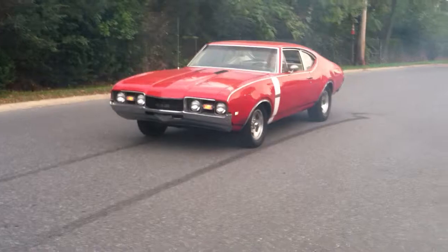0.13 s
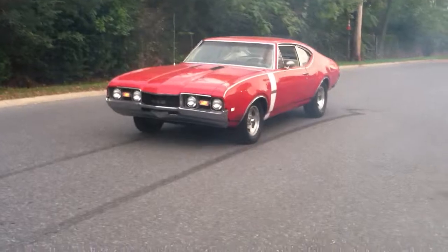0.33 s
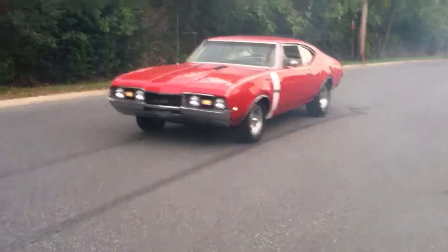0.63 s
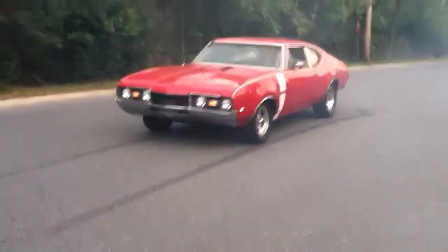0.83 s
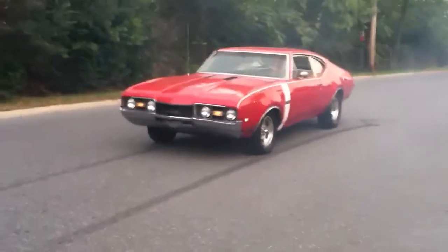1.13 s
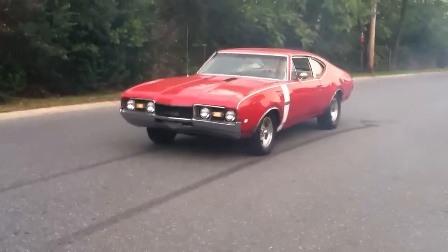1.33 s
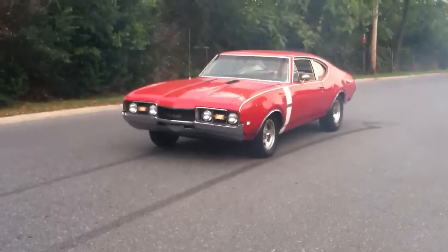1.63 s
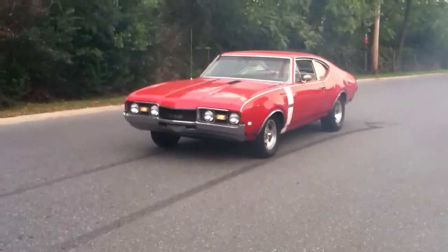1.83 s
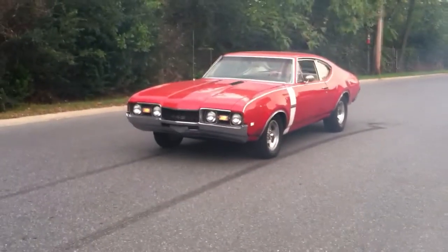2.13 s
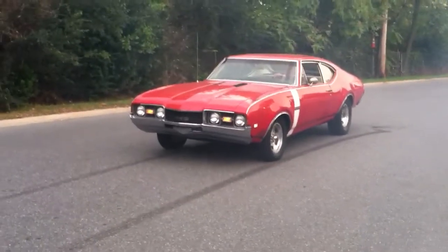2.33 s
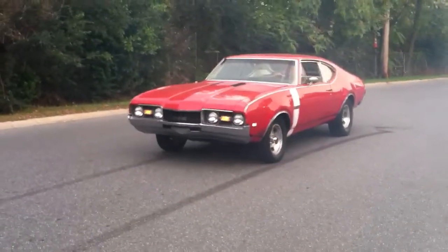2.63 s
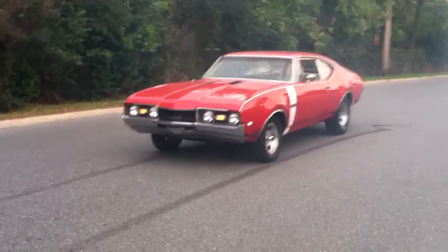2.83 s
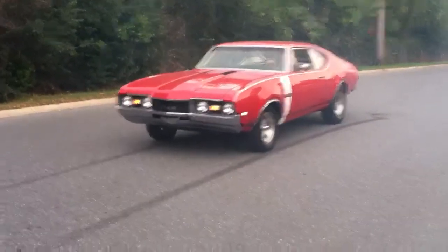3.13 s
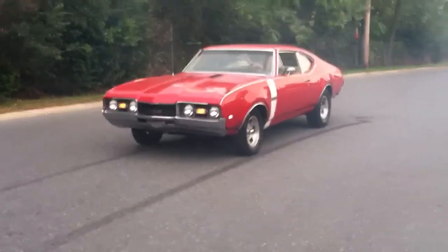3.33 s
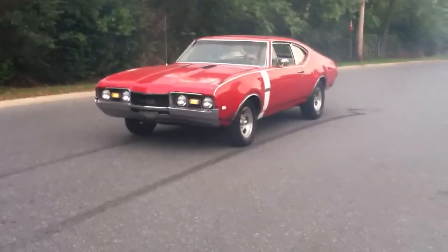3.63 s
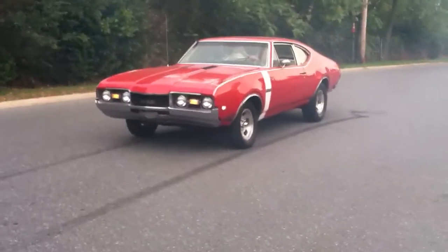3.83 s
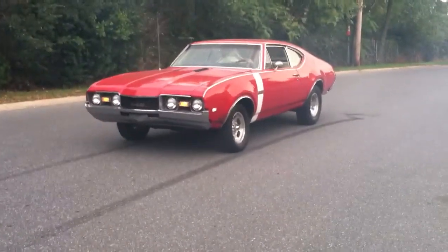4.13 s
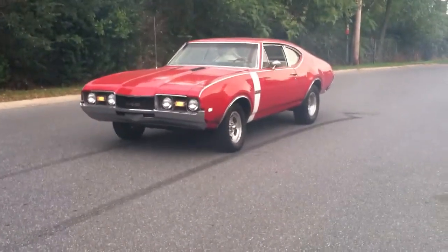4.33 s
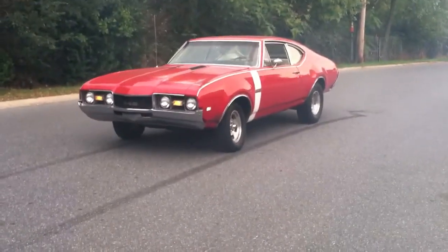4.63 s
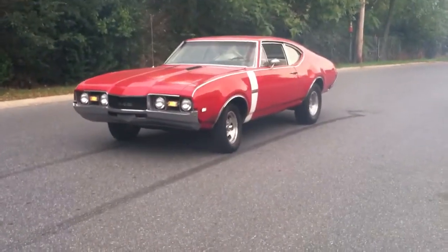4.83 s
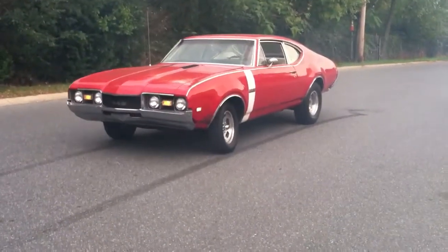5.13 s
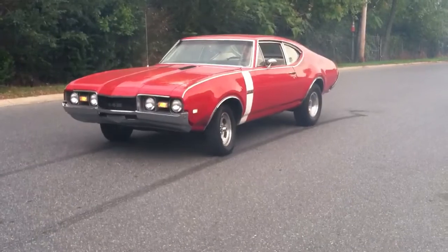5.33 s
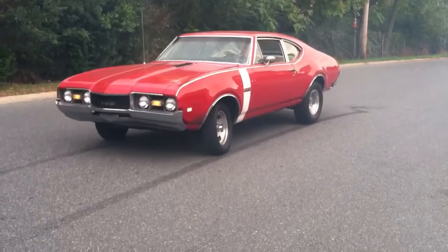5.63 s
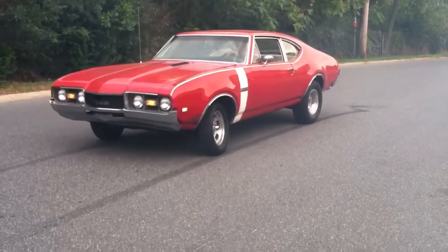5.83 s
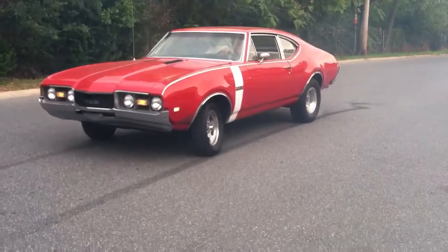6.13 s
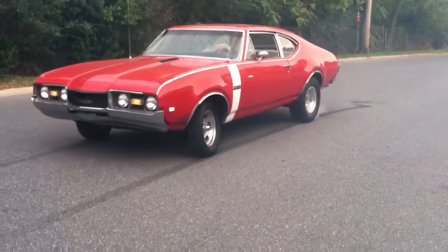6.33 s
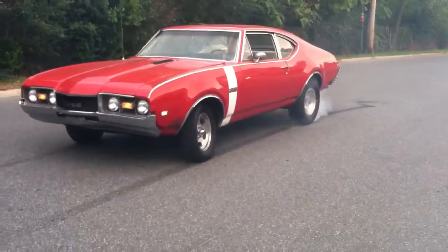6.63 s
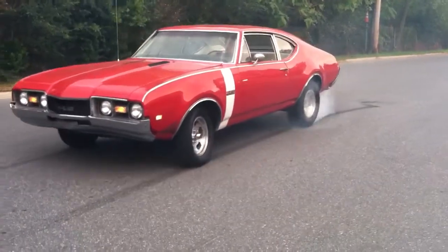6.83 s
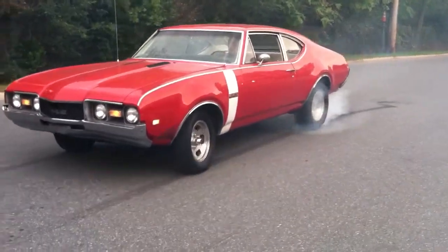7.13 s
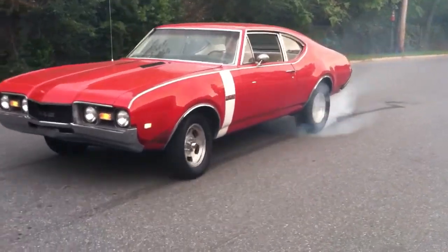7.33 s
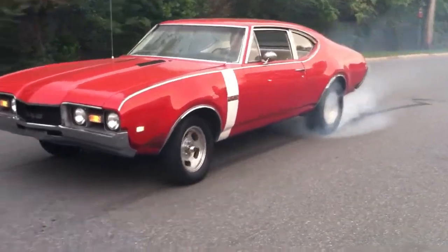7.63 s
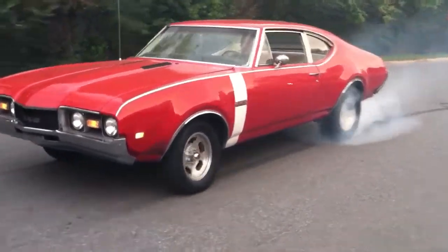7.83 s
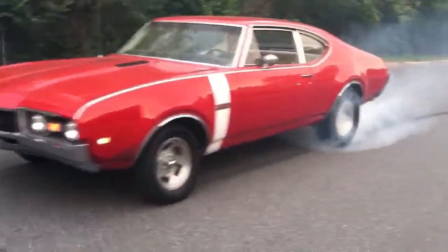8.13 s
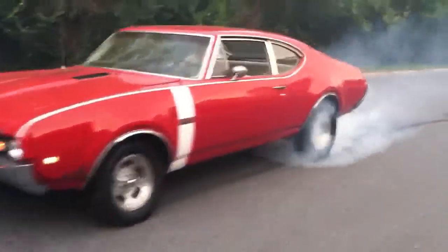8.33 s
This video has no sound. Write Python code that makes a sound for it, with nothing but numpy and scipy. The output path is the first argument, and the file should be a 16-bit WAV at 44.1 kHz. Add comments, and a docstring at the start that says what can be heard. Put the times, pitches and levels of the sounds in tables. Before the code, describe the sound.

After a tiny blank, a large V8 idles quietly and unevenly from 0 to 2 s: soft irregular puffs, breathy fluttering hiss, faint pipe ringing, a dull knock near 0.75 s and a lower one near 1.95 s. From 2 to 2.9 s revs rise quickly in surges, with about seven short brake chirps near 2.4 kHz between 2.3 and 2.9. The engine holds a steady, pulsing low growl until 3.75 s, then jumps much louder. At 3.9 s the tyres break loose: a continuous rough, fluttering squeal near 950 Hz, joined by an intermittent higher tread tone around 1.6 kHz. Revs climb gradually, then faster from 5.7 to 6.4 s, and plateau in a hard roar while the squeal rises slightly above 1 kHz. Around 8.2 s revs sag briefly; roar and sharper squeal continue to the cut at 8.5 s. Dry outdoor mono, thin bass, compressed peaks.

```python
"""A large V8 idles unevenly on a road, is loaded against the brakes, and then spins its rear tyres.
The exhaust is a set of climbing tones (orders) plus random firings, both ringing through the pipes.
Shaped noise makes the hiss and roar, with puffs at idle; wavering tones make the brake chirps.
The tyre squeal is two fluttering tones near 1 kHz with a higher tread tone. Dull knocks, deep
pressure lumps and a quiet street background complete the scene."""
import sys
import numpy as np
from scipy import signal
from scipy.fft import rfft, irfft
from scipy.io import wavfile
from scipy.ndimage import uniform_filter1d, minimum_filter1d

SR = 44100
rng = np.random.default_rng(int(sys.argv[2]) if len(sys.argv) > 2 else 0)


def volts_from_db(level):
    """Convert decibel levels to linear amplitude ratios."""
    exponent = np.asarray(level, float) / 20
    return 10 ** exponent


def to_wav(sig):
    """Store sig (one row per channel, or 1-D mono) as 16-bit WAV at the path in sys.argv[1].

    Samples outside -1..1 are clipped; the rate is SR.
    """
    pcm = np.clip(np.atleast_2d(sig), -1, 1) * 32767
    pcm = np.round(pcm).astype(np.int16)
    wavfile.write(sys.argv[1], SR, pcm.T)  # frames by channels


N = 373527
T = np.arange(N) / SR  # time of each sample, s

# Engine speed: time_s, speed_hz (four-stroke cycles per second)
ENGINE_SPEED = [(0, 5.61), (1.4, 5.83), (2, 6.94), (2.3, 9.52), (2.6, 12.8), (2.75, 13.8), (2.9, 14.43),
                (3.5, 14.35), (3.73, 14.6), (3.84, 16.48), (3.98, 19.47), (4.19, 23.18), (4.3, 24.7),
                (4.47, 26.03), (4.6, 26.71), (5, 28.1), (5.4, 29.18), (5.68, 30.8), (5.87, 33.1), (6, 35.6),
                (6.2, 40.6), (6.32, 42.66), (6.48, 44.7), (6.8, 45.65), (7.4, 45.8), (7.8, 46.65),
                (8.07, 46.6), (8.14, 45.1), (8.24, 41.1), (8.3, 40.35), (8.47, 41.1)]
# Effort of the engine, before the quick changes: time_s, exhaust_db, hiss_db (hiss from 3 to 9 kHz)
EFFORT = [(0, -48, -43), (.75, -42, -42.5), (.95, -45, -46), (2.04, -42, -43.5), (2.3, -30, -39.5),
          (2.4, -29, -35.5), (2.8, -24, -36), (3.15, -25, -34), (3.72, -24, -30.5), (3.86, -17.5, -25),
          (4.12, -17, -24), (4.4, -22, -25), (5, -22, -25), (5.64, -20, -25), (8.1, -20.5, -23.5),
          (8.2, -24, -24.5), (8.28, -18, -24), (8.47, -18, -22)]
# Share of the exhaust power that comes from random firing: time_s, share
UNEVEN = [(2.1, .9), (2.4, .55), (2.62, .3), (2.8, .04), (3.7, .04), (3.9, .12), (4.3, .06), (5.6, .06),
          (5.9, .16), (6.2, .14), (6.45, .01)]
# Engine speeds at which the order patterns below hold: speed_hz
ORDER_SPEEDS = 14.4, 22, 28.3, 30.5, 33.5, 40.7, 45.8, 46.3
# Exhaust orders at those speeds, pipe colour included: multiple_of_cycle, level_db
ORDERS_AT = [
    [(1, -41), (2, -43), (3, -50), (4, -35), (5, -33), (6, -32), (7, -30), (8, -5), (9, -5), (10, -27),
     (11, -3), (12, -8), (13, -9), (14, -15), (15, -14), (16, -3), (17, 0), (18, -11), (19, -6), (20, -13),
     (21, -19), (22, -26), (23, -18), (24, -24), (25, -15), (26, -28), (27, -15), (28, -26), (29, -32),
     (30, -27), (31, -25), (32, -15), (33, -18), (34, -25), (35, -19), (36, -18), (37, -16), (38, -33),
     (39, -20), (40, -19), (41, -22), (42, -33), (43, -28), (44, -22), (45, -21), (46, -24), (47, -24),
     (48, -25), (49, -20), (50, -18), (51, -24), (52, -19), (53, -28), (54, -26), (55, -28), (56, -27),
     (57, -21), (58, -23), (59, -24), (60, -23)],
    [(1, -42), (2, -42), (3, -39), (4, -32), (5, -21), (6, -18), (7, -13), (8, -8), (9, -17), (10, -17),
     (11, 3), (12, -13), (13, -17), (14, -18), (15, -19), (16, -16), (17, -15)],
    [(1, -45), (2, -42), (3, -35), (4, -21), (5, -8), (6, -19), (7, -13), (8, -9), (9, 0), (10, -8),
     (11, -22), (12, -22), (13, -13), (14, -18), (15, -16), (16, -22), (17, -9), (18, -15), (19, -13),
     (20, -18), (21, -13), (22, -11), (23, -15), (24, -11), (25, -13), (26, -10), (27, -12), (28, -18),
     (29, -10), (30, -8)],
    [(1, -48), (2, -40), (3, -29), (4, -19), (5, -10), (6, -17), (7, -11), (8, -2), (9, 0), (10, -12),
     (11, -17), (12, -8), (13, -16), (14, -19), (15, -14), (16, -7), (17, -13), (18, -16), (19, -12),
     (20, -14), (21, -13), (22, -10), (23, -9), (24, -13), (25, -8), (26, -12), (27, -9)],
    [(1, -37), (2, -35), (3, -31), (4, -21), (5, -5), (6, -4), (7, -3), (8, 0), (9, -5), (10, -11),
     (11, -5), (12, -15), (13, -10), (14, -18), (15, -17), (16, -6), (17, -11), (18, -11), (19, -14),
     (20, -11), (21, -11), (22, -5), (23, -9), (24, -8)],
    [(1, -46), (2, -48), (3, -22), (4, -19), (5, -16), (6, 0), (7, -13), (8, -17), (9, -9), (10, -19),
     (11, -30), (12, -11), (13, -18), (14, -16), (15, -18), (16, -10), (17, -17), (18, -14), (19, -13),
     (20, -13), (21, -21), (22, -11)],
    [(1, -48), (2, -45), (3, -15), (4, -9), (5, -4), (6, 0), (7, -22), (8, -4), (9, -9), (10, -21),
     (11, -11), (12, -5), (13, -15), (14, -7), (15, -10), (16, 0), (17, -4), (18, -13), (19, -8), (20, -10)],
    [(1, -45), (2, -37), (3, -11), (4, -17), (5, -2), (6, -2), (7, -20), (8, -11), (9, -8), (10, -19),
     (11, -16), (12, 0), (13, -15), (14, -7), (15, -6), (16, 1), (17, -3), (18, -15), (19, -9), (20, -11)],
]
# Which of the eight firings leave by the nearer pipe: 1 for near, 0 for far
NEAR_BANK = 1, 0, 1, 1, 0, 1, 0, 0
# Colour of the exhaust pipes: frequency_hz, gain_db
PIPE = [(40, -30.5), (90, -24), (115, -13.5), (170, -5.5), (235, 1), (290, -7.5), (400, -17.5), (650, -9.5),
        (900, -9), (1500, -46.5)]
# Longer ringing of the unloaded pipes, before warming: frequency_hz, width_hz, level_db
IDLE_RING = [(112.9, 2, 9), (152, 27, 9.5), (216, 3.4, 12), (623, 54, 3.5)]
# Upper exhaust beats and pauses in each cycle: place (share of cycle), change_db, half_width (share of cycle)
BEAT = [(.14, 9, 0.075), (.42, -4.5, 0.4), (.7, 0.5, .06)]
# Exhaust surges as the load comes on: time_s, change_db, half_width_s
SURGES = [(2.33, -12, 0.015), (2.38, 4.5, 0.023), (2.58, -3, 0.016), (2.69, 1, .04), (2.74, -5, .012),
          (2.84, 1, .04)]
# Colours of the hiss, one spectrum for each stage: frequency_hz, level_db
COLOURS = [
    [(650, -39), (1100, -10), (1500, -2.5), (1930, -11), (2280, -2), (2690, -18), (3220, -7.5), (4790, 2),
     (6040, -6), (6670, -13), (8140, -6), (9610, -15.5), (10900, -26), (12600, -17), (14300, -27),
     (15500, -46)],
    [(650, -13), (1100, -5.5), (1660, 0.5), (1810, -12), (2180, 5), (2440, -11), (2780, 0), (3150, -5),
     (4480, 0.5), (6970, -1), (8140, -10), (9300, -5), (10500, -20), (12700, -26), (15500, -37)],
    [(650, -43), (1100, -13), (1660, -4.5), (1810, -23), (2090, -1.5), (2490, -14), (2750, -6), (3150, -10),
     (5170, -5.5), (9610, -14.5), (11200, -31), (13400, -31), (15500, -40)],
    [(650, -32), (1100, 1), (1640, 7), (1870, -3), (2140, 2), (3010, -4.5), (3440, 7.5), (4100, 7.5),
     (5000, -1), (6240, 3), (8600, 2), (11300, -16), (12400, -16), (14500, -24), (15500, -39)],
    [(710, -35), (1200, -10.5), (1650, -6.5), (1840, -14.5), (1980, -8.5), (2650, -19.5), (3010, -21),
     (3390, -11.5), (4150, -15.5), (4620, -22), (6710, -22), (8770, -23), (11300, -45.5), (13600, -51),
     (15500, -68)],
    [(740, -24), (1250, -10.5), (1590, -4), (1850, -11.5), (2120, -8), (2380, -9), (2640, -19.5),
     (3540, -12), (4190, -13), (4610, -19.5), (5120, -18), (8490, -23), (11300, -44), (13500, -49),
     (15500, -61)],
]
# Which colour is heard when: time_s, place among the colours
STAGE = [(.62, 0), (.95, 1), (2.1, 1), (2.4, 2), (3.1, 2), (3.3, 3), (3.88, 3), (4.1, 4), (5.7, 4),
         (6.3, 5)]
# Shape of the rumble below the hiss: frequency_hz, level_db (per Hz, before the stage level)
RUMBLE = [(40, -39), (100, -46), (240, -3.5), (330, -7.5), (420, -17), (520, -1), (620, -7), (750, 3),
          (1000, 2.5), (1300, -43), (1800, -90)]
# Rumble against the top of the hiss, one for each stage: level_db
RUMBLE_DB = -8.5, -1.5, -5, 2.5, -10, -12.5
# Sharp puffs of the lumpy idle, before their soft rise: start_s, level_db
PUFFS = [(.0214, -39.5), (.1301, -49), (.2418, -40), (.3112, -40), (.3601, -50), (.412, -34),
         (.5427, -35.5), (.6684, -42), (.8116, -37.5), (.857, -39), (.9467, -39), (1.0161, -41),
         (1.0565, -39.5), (1.2027, -39), (1.2845, -50), (1.4012, -38), (1.5219, -53), (1.6272, -40),
         (1.6706, -35), (1.729, -35), (1.8128, -50), (1.943, -47), (1.9849, -37)]
# The idle hiss dips briefly: time_s, change_db, half_width_s
DIPS = [(.215, -8, 0.012), (.78, -4, 0.022), (.91, -4.5, 0.096), (1.25, -4.5, 0.041), (1.7, -6, 0.047)]
# Far traffic and air, shape only: frequency_hz, level_db (per Hz)
STREET = [(30, 24), (100, -13), (300, -3), (1000, -25.5), (4000, -24)]
# Deep lumps of pressure, strongest under load: time_s, level_db
BUFFET = [(2, -60), (3, -43), (3.8, -38.5), (4.5, -42), (5.9, -44), (6.3, -58), (8.47, -56)]
# Dull knocks, before their soft start and a gain of 3: start_s, level_db, pitch_hz, t60_s
THUDS = [(.755, -31, 358, 0.029), (1.959, -29.5, 215, 0.064)]
# Brake chirps, before flutter: start_s, length_s, level_db, start_pitch_hz, end_pitch_hz
CHIRPS = [(2.34, 0.063, -30.5, 2390, 2410), (2.429, .068, -25.5, 2460, 2360),
          (2.532, 0.062, -29, 2480, 2420), (2.621, 0.07, -29, 2520, 2350),
          (2.713, 0.067, -35.5, 2430, 2410), (2.793, 0.069, -39, 2340, 2300),
          (2.885, .035, -40, 2350, 2390)]
# Tyre squeal, before smoothing, flutter and SQUEAL_DB: time_s, stick_slip_hz, level_db
SLIP = [(3.91, 965, -23), (3.92, 970, -18), (3.93, 970, -20), (4.0, 980, -14.5), (4.04, 940, -15),
        (4.12, 939, -14.5), (4.21, 971, -19), (4.24, 926, -19), (4.28, 967, -15.5), (4.37, 937, -14),
        (4.44, 987, -16.5), (4.47, 936, -11), (4.49, 980, -19.5), (4.58, 974, -14.5), (4.61, 951.5, -19.5),
        (4.76, 911, -16), (4.78, 981, -18.5), (4.88, 979, -13), (4.92, 913.4, -19), (5.13, 982, -19),
        (5.18, 964, -14.5), (5.21, 945, -23), (5.25, 928, -15.5), (5.28, 950, -16), (5.3, 917, -19),
        (5.33, 941, -11), (5.38, 960, -18), (5.4, 949, -12), (5.54, 987, -18.5), (5.62, 951, -14),
        (5.78, 947, -16.5), (5.82, 978, -12.5), (5.94, 959, -16.5), (5.99, 988, -13.5), (6.06, 980, -22),
        (6.1, 1010, -13.5), (6.18, 1011, -18), (6.23, 988, -13), (6.28, 1017, -16), (6.51, 1023, -15),
        (6.61, 1040, -16), (6.63, 1087, -38), (6.67, 1018, -13.5), (6.79, 1046, -16.5), (7.15, 1023, -14.5),
        (7.25, 1047, -17.5), (7.29, 1042, -19.5), (7.39, 1023, -12.5), (7.42, 1059, -17), (7.5, 1030, -16),
        (7.55, 1085, -18), (7.57, 1014, -12.5), (7.72, 1054, -19.5), (7.77, 1020, -16), (7.8, 1047, -18),
        (7.85, 1003, -7.5), (7.89, 1047, -20), (7.91, 988, -12.5), (7.96, 1052, -16.5), (8.18, 1054, -14),
        (8.27, 1123, -22), (8.46, 1150, -19.5)]
# Higher tread tone, before flutter and TREAD_DB: time_s, level_db, pitch_hz
TREAD = [(4.05, -33, 1635), (4.32, -22.5, 1687), (4.66, -27.5, 1638), (4.84, -18.5, 1634),
         (5.24, -22.5, 1639), (5.29, -14.5, 1647), (5.45, -32, 1616), (5.54, -18, 1666), (5.71, -27, 1560),
         (5.78, -19, 1644), (5.94, -30, 1606), (5.98, -21, 1586), (6.03, -29, 1586), (6.26, -18, 1617),
         (6.33, -29, 1600), (7.06, -23, 1580), (7.69, -29.5, 1566), (7.99, -24.5, 1677), (8.21, -24, 1620),
         (8.46, -30, 1560)]

TOP_ORDER, ORDER_PHASE = 62, .32  # highest order; where in the cycle the firing pattern starts
BEAT_FROM_HZ = 340  # lower edge of the beating part
# Random exhaust surges start to weaken 0.24 s before the end time and settle at a quarter
LUMPS_DB, LUMPS_HZ, LUMPS_END_S = 5, 8.6, 2.4
LOPE_DB, LOPE_PHASE, LOPE_END_S = 1, .5, 1.8  # at idle the pipes swell once in each cycle
FLUTTER_DB, FLUTTER_HZ, IDLE_PATCH_DB = 4, 30.2, 1  # the idle treble flutters and is patchier
PUFF_RISE_S, PUFF_T60_S = .003, .12
STREET_DB, DEEP_HZ = -46, 49
CHIRP_RISE_S, CHIRP_HOLD, CHIRP_FALL_DB = .0082, .43, -5  # the hold ends at this share of the length
CHIRP_STUTTER_DB = 4.5
BITE_S = 3.917  # the tyres break loose
SETTLE_S = .13  # span that smooths the slow pitch of the squeal; faster flutter is added to it
SQUEAL_DB = -2.24  # level change of the whole squeal near 1 kHz
FAR_TYRE, FAR_TYRE_HZ = .35, -15  # size of the far tyre's tone, and how much lower it slips
SECOND_DB, SECOND_SWAY_DB, SECOND_FADE_DB_PER_S = -10.5, 4.5, -1.5  # second harmonic against the squeal
CHATTER_DB, CHATTER_HZ = 3.2, 45  # short uneven breaks of the grip
FUZZ_DB, FUZZ_WIDTH_HZ, FUZZ_BELOW_HZ = -5, 95, 10  # small tread blocks ring at random near each tone
TREAD_DB = -2.5  # level change of the whole tread sound: tone, fuzz and overtone
TREAD_SWAY_DB = 1.5
RASP_RATIO, RASP_DB = 2.05, -7.5  # overtone of the tread tone, and its level against it


def evened(x):
    """Scales to rms 1."""
    return x / np.sqrt(np.mean(x ** 2) + 1e-20)


def read(points, hz):
    """Reads a spectrum on a log-frequency axis."""
    f, value = np.transpose(points)
    return np.interp(np.log(hz + 1), np.log(f + 1), value)


def columns(rows, t):
    """Joins the rows of a curve by straight lines."""
    s, *values = np.transpose(rows)
    return [np.interp(t, s, v) for v in values]


def bumps(rows, t):
    """Sum of bell-shaped changes of level, in dB."""
    return sum(db * np.exp(-((t - s) / half) ** 2) for s, db, half in rows)


def levelled(x, span=8820):
    """Divides out the slow level."""
    return x / np.sqrt(uniform_filter1d(x ** 2, int(span)) + 1e-12)


def wander(hz, count):
    """Smooth random curve of about rms 1 that changes up to about hz times a second."""
    lowpass = signal.butter(2, hz, fs=SR, output="sos")
    slow = signal.sosfiltfilt(lowpass, rng.standard_normal(count + SR))
    return evened(slow)[SR // 2:][:count]


def turning(hz):
    """Adds up a pitch curve in Hz into the running angle of its wave."""
    return 2 * np.pi * np.cumsum(hz) / SR


def resonate(x, hz, width):
    """A resonance of gain 1 that follows the curve hz."""
    turn = np.exp(1j * turning(hz * np.ones(len(x))))
    r = np.exp(-np.pi * width / SR)
    return 2 * (turn * signal.lfilter([1 - r], [1, -r], x / turn)).real


def piped(x):
    """Colour of the pipes: each pulse rings on after it, never before."""
    hz = abs(np.fft.fftfreq(16384, 1 / SR))
    log_gain = np.log(volts_from_db(read(PIPE + [(4000, -90)], hz)))
    ring = np.fft.ifft(np.exp(np.conj(signal.hilbert(log_gain)))).real[:4096]
    return signal.oaconvolve(x, ring)[:N]


def steady_orders(speed, cycles):
    """Repeated firing gives tones at whole multiples of the engine cycle, not yet coloured by the pipes."""
    pattern = np.fft.fft(1 + .8 * np.array(NEAR_BANK)) + 1e-3
    steady = np.zeros(N)
    coarse = slice(0, N, 10)  # every tenth sample is enough below 2 kHz
    slow_speed = speed[coarse]
    # unequal pipe lengths smear the pulses more and more as the firings crowd together
    lag = rng.uniform(-np.pi, np.pi, 64)
    spread = np.clip((slow_speed - 12) / 18, .15, 1)
    for k in range(1, TOP_ORDER + 1):
        # the pattern of orders follows speed, the pipe colour stays at its frequency
        bare_db = []
        for orders, s in zip(ORDERS_AT, ORDER_SPEEDS):
            missing_db = -23 - 17 * (k * s > 950)
            bare_db.append(dict(orders).get(k, missing_db) - read(PIPE, k * s))
        # no order stays quite even
        drift_db = (1 + spread) * np.interp(T[coarse] * 5, range(50), rng.standard_normal(50))
        size = volts_from_db(np.interp(slow_speed, ORDER_SPEEDS, bare_db) + drift_db)
        size = size * (k * slow_speed < 2000)
        angle = 2 * np.pi * k * (cycles[coarse] + ORDER_PHASE)
        steady[coarse] += size * np.cos(angle + np.angle(pattern[k % 8]) + spread * lag[k])
    return steady


def random_firings(cycles):
    """Eight kicks of random strength in each cycle, over flowing gas, ring through the pipes."""
    fired = np.flatnonzero(np.diff(np.floor(8 * cycles)))
    kicks = np.zeros(N)
    kicks[fired] = np.clip(rng.standard_normal(len(fired)), -1.2, 1.2)
    # flowing gas keeps the pipes sounding between firings
    gas = evened(kicks) + 1.5 * rng.standard_normal(N)
    warm = np.interp(T, (0, 2, 2.6), (.97, 1.01, 1.025))  # hotter gas rings higher
    ring = sum(volts_from_db(db) * evened(resonate(gas, hz * warm, width)) for hz, width, db in IDLE_RING)
    unloaded = np.clip((2.7 - T) / .3, 0, 1)
    return levelled(piped(gas)) + 2.5 * levelled(ring) * unloaded


def exhaust():
    """Steady orders of the firing pattern plus firings of random strength, both through the pipes."""
    speed, level_db, uneven = columns(ENGINE_SPEED, T)[0], columns(EFFORT, T)[0], columns(UNEVEN, T)[0]
    cycles = np.cumsum(speed * (1 + .003 * wander(12, N))) / SR
    steady = levelled(piped(steady_orders(speed, cycles)))
    lumps = levelled(random_firings(cycles))
    mixed = np.sqrt(1 - uneven) * steady + np.sqrt(uneven) * lumps
    # held on the brakes, the upper exhaust beats in each cycle
    held = np.interp(T, (2.2, 2.5, 3.75, 3.95), (0, 1, 1, 0))
    upper = signal.sosfiltfilt(signal.butter(4, BEAT_FROM_HZ, "high", fs=SR, output="sos"), mixed)
    mixed = mixed + upper * (volts_from_db(held * bumps(BEAT, cycles % 1)) - 1)
    unsteady = np.clip((LUMPS_END_S - T) / .24, .25, 1)
    surge_db = bumps(SURGES, T) + LUMPS_DB * wander(LUMPS_HZ, N) * unsteady
    loping = np.clip((LOPE_END_S - T) / .15, 0, 1)
    surge_db += LOPE_DB * np.cos(2 * np.pi * (cycles - LOPE_PHASE)) * loping
    return volts_from_db(level_db + surge_db) * mixed, cycles


def hiss_noise():
    """Patchy noise for gas and rubber, its colour moving by stage, with rms 1 from 3 to 9 kHz."""
    frames, hz = N // 128 + 5, np.fft.rfftfreq(512, 1 / SR)
    t = np.arange(frames) * 128 / SR
    a, b, patches = rng.standard_normal((3, 257, frames))
    # smooth over frequency, then over time
    patches = evened(uniform_filter1d(uniform_filter1d(patches, 8, 0), 12, 1))
    colours = volts_from_db([read(c, hz) for c in COLOURS])
    treble_power = (colours[:, (hz > 3000) & (hz < 9000)] ** 2).sum(1)
    place = columns(STAGE, t)[0]
    rumble_db = np.interp(place, range(len(RUMBLE_DB)), RUMBLE_DB)
    share = np.maximum(1 - abs(place - np.arange(len(COLOURS))[:, None]), 0)
    share /= treble_power[:, None]  # every colour is equally loud in the treble
    idle = np.clip((2.3 - t) / .22, 0, 1)
    patch_db = .79 + IDLE_PATCH_DB * idle
    treble = np.clip((hz - 4000) / 5000, 0, 1)
    flutter_db = FLUTTER_DB * np.outer(treble, idle * np.interp(t, T, wander(FLUTTER_HZ, N)))
    rumble = volts_from_db(read(RUMBLE, hz)[:, None] + rumble_db) ** 2 * share.sum(0)
    field = np.sqrt(colours.T ** 2 @ share + rumble) * volts_from_db(patch_db * patches + flutter_db)
    noise = signal.istft((a + 1j * b) * field, nperseg=512, noverlap=384)[1][:N]
    band = signal.butter(4, (3000, 9000), "band", fs=SR, output="sos")
    return noise / np.std(signal.sosfilt(band, noise))


def hiss(cycles):
    """Exhaust gas and scrubbing rubber: noise pulsed by the firing, with puffs and brief dips."""
    firing = 8 * cycles
    near = np.array(NEAR_BANK)[firing.astype(int) % 8]
    pulsed = 1 + .11 * np.exp(-(firing % 1) / .35) * (1 + near)  # the nearer pipe pulses twice as much
    power = volts_from_db(columns(EFFORT, T)[1] + .59 * wander(42, N) + 1.2 * wander(4.3, N)) ** 2
    for s, db in PUFFS:
        half_second = slice(round(s * SR), round(s * SR) + SR // 2)
        late = T[half_second] - s
        rise = 1 - np.exp(-late.clip(0) / PUFF_RISE_S)
        power[half_second] += volts_from_db(db - 60 * late / PUFF_T60_S) ** 2 * rise
    return hiss_noise() * pulsed * np.sqrt(power) * volts_from_db(bumps(DIPS, T))


def street():
    """Far traffic and air: steady low noise with a fixed spectrum."""
    spectrum = rfft(rng.standard_normal(N)) * volts_from_db(read(STREET, np.fft.rfftfreq(N, 1 / SR)))
    return volts_from_db(STREET_DB) * evened(irfft(spectrum, N))


def buffet():
    """Lumpy deep pressure in the air around the car: low noise of wandering level."""
    deep = signal.sosfilt(signal.butter(3, DEEP_HZ, fs=SR, output="sos"), rng.standard_normal(N))
    return volts_from_db(columns(BUFFET, T)[0] + 3.1 * wander(7.3, N)) * evened(deep)


def thuds():
    """Soft-edged low knocks: sine waves that die away quickly."""
    out = np.zeros(N)
    for s, db, hz, t60 in THUDS:
        late = (T - s).clip(0)
        rise = 1 - np.exp(-late / .0027)
        out += 3 * volts_from_db(db - 60 * late / t60) * np.sin(2 * np.pi * hz * late) * rise
    return out


def brakes():
    """Short wavering squeaks of pad on disc, with an overtone: quick rise, hold, fall."""
    out = np.zeros(N)
    for s, length, top_db, from_hz, to_hz in CHIRPS:
        on = (T >= s) & (T < s + length)
        count = on.sum()
        corners = 0, CHIRP_RISE_S, CHIRP_HOLD * length, length
        db = top_db + np.interp(T[on] - s, corners, (-15, 0, -1.5, CHIRP_FALL_DB))
        db += CHIRP_STUTTER_DB * wander(55, count).clip(-2, .6)
        glide = np.linspace(from_hz, to_hz, count)
        turns = turning(glide + 45 * wander(200, count) + 25 * wander(40, count))
        tone = np.sqrt(2) * np.cos(turns)
        tone += volts_from_db(-6) * np.cos(2 * turns + .89 * wander(300, count))
        out[on] = volts_from_db(db) * tone * signal.windows.tukey(count, .3)
    return out


def squeal():
    """Two tyres stick and slip at nearly the same fluttering rate; a higher tread tone flutters more."""
    t = T[T >= SLIP[0][0]]
    count, since = len(t), t - t[0]
    (hz, db), (tread_db, tread_hz) = columns(SLIP, t), columns(TREAD, t)
    db = db + SQUEAL_DB
    hz = uniform_filter1d(hz, size=int(SETTLE_S * SR), mode="nearest")
    second_db = db + SECOND_DB + SECOND_FADE_DB_PER_S * since + SECOND_SWAY_DB * wander(18, count)
    second_db += 5 * np.exp(-since / .11)  # stronger at the start
    loose = np.clip((t - 4) / .3, .7, 1)  # the grip is cleaner at first, then chatters more
    catch_hz = 150 * np.exp(-(t - BITE_S).clip(0) / .013)  # the first bite starts sharp
    out = np.zeros(count)
    for size, offset_hz in ((1, 0), (FAR_TYRE * loose, FAR_TYRE_HZ)):
        flutter_hz = loose * (19 * wander(90, count) + (3 - offset_hz) * wander(20, count))
        turns = turning(hz + catch_hz + flutter_hz + offset_hz + 6)
        chatter_db = CHATTER_DB * loose * wander(CHATTER_HZ, count).clip(-4, 1)
        grip = size * np.sqrt(2) * volts_from_db(1.6 * loose * wander(90, count) + chatter_db)
        out += grip * (volts_from_db(db) * np.cos(turns) + volts_from_db(second_db) * np.cos(2 * turns))

    # small tread blocks: noise through two equal resonances, for the squeal and for the tread tone
    scrub = rng.standard_normal(count)
    slip_fuzz, tread_fuzz = [
        evened(resonate(resonate(scrub, f, FUZZ_WIDTH_HZ), f, FUZZ_WIDTH_HZ))
        for f in (hz - FUZZ_BELOW_HZ, tread_hz)]
    out += volts_from_db(db + FUZZ_DB) * loose ** 2 * slip_fuzz

    turns = turning(tread_hz + 22 * wander(60, count) + 45 * wander(18, count))
    tread = np.cos(turns) * volts_from_db(4 * wander(30, count).clip(-3, .5)) + volts_from_db(FUZZ_DB) * tread_fuzz
    rasp_flutter_hz = 35 * wander(60, count) + 80 * wander(14, count)
    rasp = np.cos(turning(RASP_RATIO * tread_hz + rasp_flutter_hz))
    tread += volts_from_db(RASP_DB + 2.5 * wander(25, count)) * rasp
    sway_db = 1.6 * wander(39, count) + TREAD_SWAY_DB * wander(21, count)
    out += np.clip((t - 4) / .28, 0, 1) * volts_from_db(tread_db + TREAD_DB + sway_db) * tread
    onset = np.clip((t - BITE_S) / .0049, 0, 1)
    return np.pad(out * onset, (N - count, 0))


def scene():
    """Adds the sounds of the car and the street in one channel."""
    pipes, cycles = exhaust()
    car = pipes + hiss(cycles) + buffet() + thuds() + brakes() + squeal()
    return (car + street())[None]


def low_pass(x):
    """Removes everything above the highest recorded frequency."""
    return signal.sosfilt(signal.butter(12, 15610, fs=SR, output="sos"), x)


def record(dry):
    """The microphone cuts deep bass and top, a fast limiter holds the peaks; a short blank comes first."""
    thin = signal.sosfilt(signal.butter(3, 96, "high", fs=SR, output="sos"), dry)
    thin = signal.sosfilt(signal.butter(10, 15000, fs=SR, output="sos"), thin)
    room = np.minimum(.7 / (abs(thin) + 1e-9), 1)  # gain that would keep each sample under the ceiling
    held = thin * uniform_filter1d(minimum_filter1d(room, size=177), size=177)
    mix = held * (T >= .0212)  # silent until this time, s
    return low_pass(mix)


dry = scene()
out = record(dry)
to_wav(out)
```